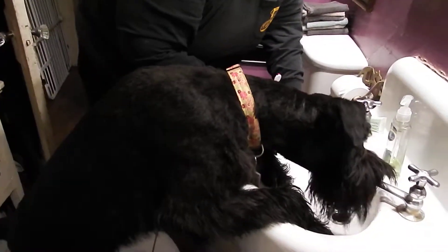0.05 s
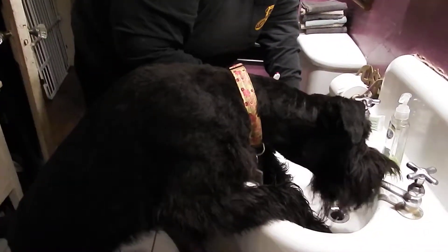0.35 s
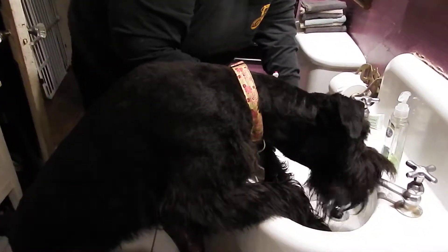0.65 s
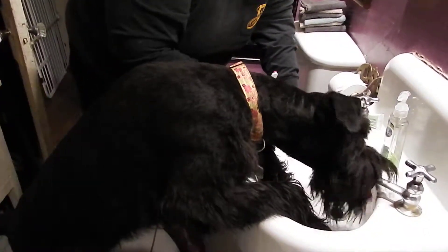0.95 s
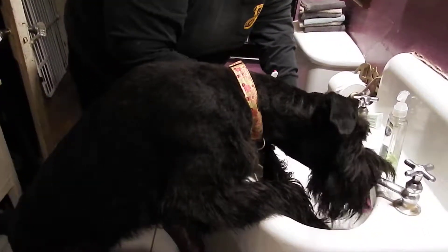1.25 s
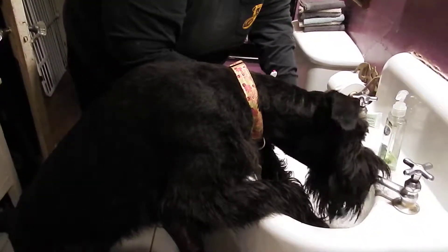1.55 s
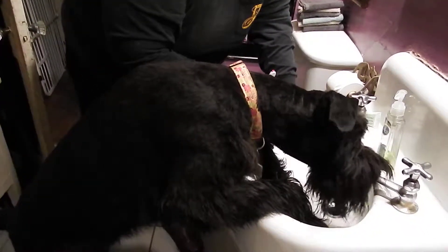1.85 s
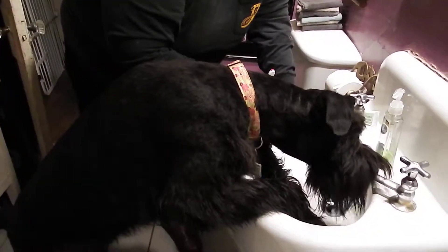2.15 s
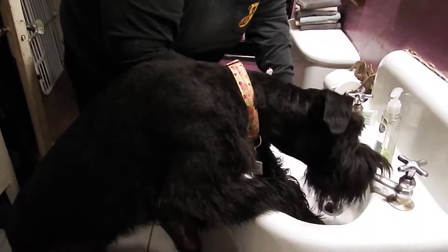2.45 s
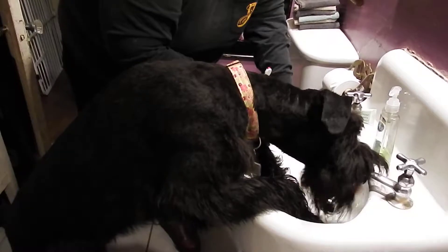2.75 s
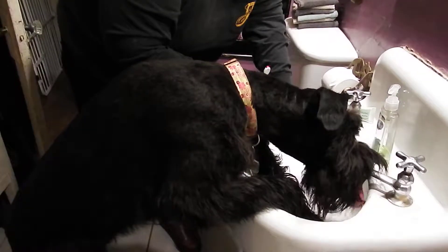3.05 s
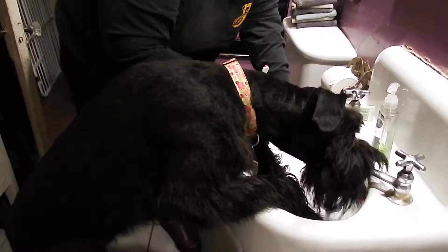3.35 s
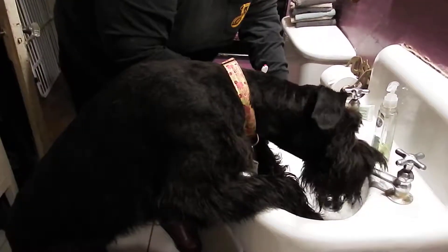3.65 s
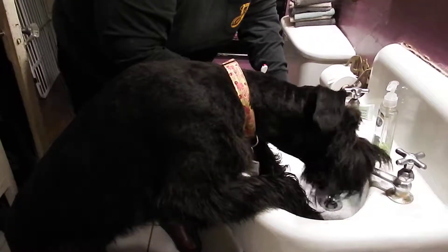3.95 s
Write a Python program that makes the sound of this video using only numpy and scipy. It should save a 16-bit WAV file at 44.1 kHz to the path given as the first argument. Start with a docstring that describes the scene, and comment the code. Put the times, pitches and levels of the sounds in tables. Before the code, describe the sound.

A dog laps water in a sink for the whole four seconds, about three licks a second, heard close in a small bathroom. Each slurp is often followed by a soft hollow gulp and a wet slap, with popping bubbles and droplets ticking on the basin. Sharper mouth clicks stand out around 2.2, 2.8 and 3.9 seconds. A thinly running tap hisses and trickles steadily underneath.

```python
"""A dog drinks from a tap

A dog laps at a thinly running tap in the basin of a small bathroom, about three times a second.
The tongue slurps through the water, often a hollow gulp follows, and the mouth shuts with a wet slap.
Bubbles pop and gurgle, droplets tick on the china, and the tap hisses throughout.
The hiss is filtered noise; the other wet sounds are short fading tones, alone or in swarms."""
import sys
import numpy as np
from scipy import signal
from scipy.fft import rfft, irfft, next_fast_len
from scipy.io import wavfile
from scipy.ndimage import uniform_filter1d

SR = 44100
rng = np.random.default_rng(int(sys.argv[2]) if len(sys.argv) > 2 else 0)


def dump_mix(stems):
    """Bounce the given channels to the path in sys.argv[1] as a 16-bit WAV at rate SR."""
    frames = np.atleast_2d(stems).T  # one column per channel
    limited = np.clip(frames, -1, 1)  # hard clip at full scale
    pcm = np.round(limited * 32767).astype(np.int16)
    wavfile.write(sys.argv[1], SR, pcm)


N = 176400  # 4 seconds

# the tone colour of the tap's hiss: f/Hz, level/dB
HISS_COLOUR = [(50, -39), (130, -5.5), (300, -1.5), (480, -8.5), (660, -1), (1400, -2), (5100, -2.5),
               (6200, -17), (15500, -19)]
# the spout rings in the hiss, the highest pitch as a thin whistle: f/Hz, boost/dB
SPOUT_RESONANCES = [(2490, 1), (2870, 5.5), (4450, 3.5), (4900, 5), (11220, 8.5)]
# droplets tick on the china: t/s, level/dB
TICKS = [(.484, -12), (.805, -18.5), (1.181, -17.5), (1.506, -26), (1.733, -19), (2.235, -18), (2.583, -29),
         (2.858, -26), (2.973, -21.5), (3.668, -30), (3.697, -11), (3.942, -28)]
# large bubbles gurgle: t/s, level/dB, f/Hz
GURGLES = [(.076, -39.5, 760), (.394, -44, 716), (.772, -45, 630), (1.096, -44.5, 660), (1.389, -41, 1020),
           (1.486, -41.5, 716), (1.802, -47, 610), (1.876, -41.5, 673), (1.916, -41.5, 1430),
           (2.5, -40.5, 1350), (3.218, -41.5, 885), (3.32, -40, 836), (3.672, -40.5, 1390)]
# small bubbles pop: t/s, level/dB, f/Hz
POPS = [(.103, -23.5, 1670), (0.116, -19, 3715), (0.282, -20.5, 3170), (0.3959, -18.5, 1770),
        (0.481, -19.5, 1620), (.495, -19.5, 3870), (0.654, -26, 2100), (0.786, -21, 1860),
        (0.801, -16.5, 1510), (1.1, -22.5, 1900), (1.375, -24.5, 3580), (1.494, -18.5, 1860),
        (1.894, -18.5, 3660), (2.111, -19.5, 2190), (2.488, -14, 1940), (2.495, -19.5, 1690),
        (2.584, -26, 3830), (2.834, -24.5, 3360), (2.857, -16, 2024), (2.972, -20, 1590),
        (3.548, -23.5, 2000), (3.696, -19.5, 3870), (3.707, -25, 3570), (3.947, -16, 2030),
        (3.967, -16.5, 2120), (3.987, -17.5, 1800)]
# drips plop into the water: t/s, level/dB, f/Hz
DRIPS = [(0.93, -43.5, 596), (1.611, -32, 1220), (1.636, -37.5, 718), (2.531, -33, 598),
         (3.629, -36.5, 620), (3.751, -33, 1230)]
# sharp wet clicks of the mouth: t/s, level/dB, f/Hz
MOUTH_CLICKS = [(1.177, -16.5, 2070), (2.215, -13, 2540), (2.436, -17.5, 2320), (2.7679, -8.5, 2550),
                (3.069, -13.5, 2430), (3.877, -9, 2210), (3.937, -13, 3400)]
# the mouth slaps shut: t/s, slosh level/dB, spray level/dB
SLAPS = [(0.097, -41.5, -39.5), (.481, -36, -44), (.8, -35, -36.5), (1.175, -35, -35.5),
         (1.508, -36, -37.5), (1.893, -40.5, -39), (2.22, -34, -33), (2.579, -38, -37), (2.969, -39, -33.5),
         (3.336, -45.5, -41), (3.662, -50.5, -40.5)]
# hollow gulps under the tongue: t/s, level/dB
GULPS = [(0.069, -48.5), (.452, -40), (0.763, -49.5), (1.149, -38.5), (1.474, -44.5), (2.191, -41),
         (2.532, -38.5), (2.934, -43.5), (3.652, -42)]
# the tongue draws through the water: t/s, length/s, level/dB, f/Hz
SLURPS = [(0.0, 0.026, -42.5, 2850), (0.272, 0.027, -37, 3080), (0.346, 0.1, -40.5, 2900),
          (0.66, 0.099, -40, 2420), (1.036, 0.058, -36.5, 2640), (1.361, 0.099, -38, 2680),
          (1.757, 0.059, -36, 3280), (1.828, 0.055, -41.5, 3120), (2.092, 0.077, -35, 2815),
          (2.43, 0.077, -36, 2435), (2.55, 0.017, -37.5, 2460), (2.83, 0.095, -41, 2690),
          (3.183, 0.069, -36, 2340), (3.54, 0.054, -40.5, 2640), (3.93, 0.083, -41.5, 2400)]
# echoes off the basin: delay/s, gain
BASIN_ECHOES = [(.0021, 1), (.0079, 0.31)]
# how wide the reflected sound is, as the part that differs between left and right: f/Hz, level/dB
STEREO_WIDTH = [(100, -8.5), (2400, -20), (8000, 0)]
# the basin and room favour these pitches: f/Hz, boost/dB
ROOM_RESONANCES = [(620, 3.5), (868, 1.5), (1004, 4), (1654, 5)]
# the microphone's tone colour: f/Hz, level/dB
MIC_COLOUR = [(235, -20.5), (290, -6), (5100, -1), (5900, -7), (9000, -8.5), (15000, -21.5)]

BUBBLE_RISE_OCT_PER_S, BUBBLE_ONSET_CYCLES = 15.2, 0.31  # OCT means octaves
SPATTER_HZ, SPATTER_SPREAD_OCT = 8000, 0.44


def from_db(db):
    """Turn decibels into a factor to multiply by."""
    return 10 ** (np.asarray(db) / 20)


def rms_one(x):
    """Scale a sound so that its average strength (rms) is one."""
    return x / np.sqrt(np.mean(x ** 2) + 1e-20)


def seconds(length):
    """The time of each sample, in seconds."""
    return np.arange(int(length * SR)) / SR


def add(out, start_s, sound):
    """Mix a sound in at a given time."""
    i = int(np.clip(start_s * SR, 0, len(out)))
    out[i:i + len(sound)] += sound[:len(out) - i]


def coloured(x, points):
    """Make pitches louder or softer along a table of f/Hz, level/dB."""
    n = 2 * next_fast_len(len(x))
    hz, db = np.transpose(points)
    bin_hz = np.arange(n // 2 + 1) * SR / n
    curve_db = np.interp(np.log(bin_hz + 1), np.log(hz), db)
    cepstrum = irfft(np.log(from_db(curve_db)))
    # fold it so that the filter rings only after a sound, never before (minimum phase)
    cepstrum[1:n // 2] *= 2
    cepstrum[n // 2 + 1:] = 0
    return irfft(rfft(x, n) * np.exp(rfft(cepstrum)))[:len(x)]


def boosted(x, resonances, width_hz):
    """Make narrow bands ring, from a table of f/Hz, boost/dB."""
    for hz, db in resonances:
        band = signal.lfilter(*signal.iirpeak(hz, hz / width_hz, fs=SR), x)
        x = x + (from_db(db) - 1) * band
    return x


def high_pass(x, hz):
    """Turn down what lies below a pitch."""
    return signal.sosfilt(signal.butter(3, hz, "high", fs=SR, output="sos"), x)


def evened(response):
    """Even out the broad tone colour of a room's echo and keep its fine ripple."""
    hz = np.arange(1, len(response) // 2 + 1) * SR / len(response)
    power = np.abs(rfft(response)[1:]) ** 2
    levelling_db = 10 * np.log10(power.mean() / uniform_filter1d(power, size=48))
    return coloured(response, np.column_stack([hz, levelling_db]))


def bubble(hz, cycles):
    """A bubble rings: a tone that starts fast, rises a little and fades by 60 dB within its cycles."""
    t = seconds(cycles / hz)
    phase = np.cumsum(hz * 2 ** (BUBBLE_RISE_OCT_PER_S * t)) / SR
    onset = 1 - np.exp(-t * hz / BUBBLE_ONSET_CYCLES)
    fade = from_db(-60 * t * hz / cycles)
    return np.sin(2 * np.pi * phase) * onset * fade


def froth(envelope, hz, spread_oct, per_s, cycles=13, fall_oct=0):
    """A swarm of bubbles around a pitch that can slide, as strong as the envelope (a loudness curve)."""
    out = np.zeros(len(envelope) + SR // 20)
    length = len(envelope) / SR
    count = int(per_s * length) + 1
    swarm_rng = np.random.default_rng(rng.integers(1 << 30))
    for k, (jitter, pitch, size, sign) in enumerate(swarm_rng.standard_normal((count, 4))):
        progress = (k + jitter) / count % 1
        octaves = spread_oct * np.fmod(pitch, 2) - fall_oct * (progress - .5)
        bubble_hz = np.clip(hz * 2 ** octaves, 200, 12000)
        strength = envelope[int(progress * (len(envelope) - 1))]
        scatter_db = 5 * min(size, 2)
        gain = strength * from_db(scatter_db) * np.sqrt(bubble_hz / hz)
        add(out, progress * length, np.sign(sign) * gain * bubble(bubble_hz, cycles))
    return out * np.sqrt(np.sum(envelope ** 2) / (np.sum(out ** 2) + 1e-20))


def bathroom(x, pan_db=0, reverb_db=0):
    """The sound reaches two close microphones directly, off the basin and off the walls."""
    t = seconds(.4)

    def reverb(db, fade_s):
        """Echoes blur into noise that builds up quickly and dies by 60 dB in fade_s."""
        fade = from_db(-60 * t / fade_s) * (1 - np.exp(-t / 0.006))
        return from_db(db + reverb_db) * fade / np.sqrt(np.sum(fade ** 2)) * rng.standard_normal(len(t))

    # early echoes plus a short tail; left is mid + side, right is mid - side
    mid, side = (reverb(db=4, fade_s=0.053) + reverb(db=-2.5, fade_s=0.23) for _ in range(2))
    mid[0] += 1  # the direct sound
    for delay_s, gain in BASIN_ECHOES:
        add(mid, delay_s, np.array([gain]))
    mid, side = evened(mid), coloured(side, STEREO_WIDTH)
    left = from_db(pan_db) * signal.fftconvolve(x, mid + side)[:N]
    right = from_db(-pan_db) * signal.fftconvolve(x, mid - side)[:N]
    return np.array([left, right])


def tap():
    """A hiss that rings in the spout, a fine trickle into the basin and its stray droplets."""
    noise = coloured(rng.standard_normal(N), HISS_COLOUR)
    hiss = from_db(-49) * rms_one(boosted(noise, SPOUT_RESONANCES, width_hz=110))
    steady = np.ones(N)
    trickle = from_db(-55) * froth(steady, hz=2364, spread_oct=.6, per_s=260, cycles=57)
    strays = from_db(-65.5) * froth(steady, SPATTER_HZ, SPATTER_SPREAD_OCT, per_s=45)
    return hiss + (trickle + strays)[:N]


def droplets():
    """Droplets hit the china with very short, bright ticks."""
    out = np.zeros(N)
    for start_s, db in TICKS:
        add(out, start_s, from_db(db) * bubble(hz=9220, cycles=11.3))
    return high_pass(out, hz=6200)


def glug(hz, rise_oct_per_s, swell_s, length_s=.05):
    """A cluster of large bubbles swells, rises in pitch and fades."""
    t = seconds(length_s)
    envelope = (t / swell_s * np.exp(1 - t / swell_s)) ** 2
    return froth(envelope, hz, spread_oct=0.09, per_s=600, fall_oct=-rise_oct_per_s * length_s)


def stirred_water():
    """Large bubbles gurgle, small ones pop and drips plop into the water."""
    out = np.zeros(N)
    for start_s, db, hz in GURGLES:
        add(out, start_s, from_db(db) * glug(hz, rise_oct_per_s=1, swell_s=0.01))
    for start_s, db, hz in POPS:
        add(out, start_s, from_db(db) * bubble(hz, cycles=0.01 * hz))  # each lasts 0.01 s
    for start_s, db, hz in DRIPS:
        add(out, start_s, from_db(db) * bubble(hz, cycles=28))
    return out


def spatter(envelope):
    """Tiny bright droplets fly off, much softer than the slurp or slap that throws them."""
    return from_db(-22.5) * froth(envelope, SPATTER_HZ, SPATTER_SPREAD_OCT, per_s=700)


def mouth():
    """The mouth gulps, clicks and slaps shut with a low slosh and a bright spray."""
    out = np.zeros(N)
    attack_s, fade_s = 0.0065, 0.12
    t = seconds(fade_s)
    envelope = np.minimum(t / attack_s, from_db(-60 * (t - attack_s) / fade_s))
    for start_s, slosh_db, spray_db in SLAPS:
        slosh = froth(envelope, hz=780, spread_oct=0.677, per_s=1800)
        spray = froth(envelope, hz=2163, spread_oct=0.677, per_s=1800)
        add(out, start_s, from_db(slosh_db) * slosh)
        add(out, start_s, from_db(spray_db) * (spray + spatter(envelope)))
    for start_s, db in GULPS:
        add(out, start_s, from_db(db) * glug(hz=308, rise_oct_per_s=2.9, swell_s=0.0064))
    for start_s, db, hz in MOUTH_CLICKS:
        add(out, start_s, from_db(db) * bubble(hz, cycles=7.1))
    return out


def tongue():
    """Each slurp is a crackle of bubbles that throws spatter and sinks in pitch as the tongue draws back."""
    out = np.zeros(N)
    for start_s, length_s, db, hz in SLURPS:
        progress = seconds(length_s) / length_s
        envelope = np.interp(progress, [0, 0.37, 1], [.25, 1, .2])
        slurp = froth(envelope, hz, spread_oct=0.44, per_s=700, cycles=28, fall_oct=0.27)
        add(out, start_s, from_db(db) * (slurp + spatter(envelope)))
    # once, a growing air pocket under the tongue gurgles downwards
    steady = np.ones_like(seconds(.09))
    pocket = froth(steady, hz=820, spread_oct=.04, per_s=600, cycles=28, fall_oct=.65)
    add(out, start_s=2.426, sound=from_db(-51.5) * pocket)
    return out


def scene():
    """The dog, the droplets and the tap sound together in the ringing room."""
    lapping = high_pass(tongue() + mouth() + stirred_water(), hz=145)
    dog = bathroom(lapping)
    ticks = bathroom(droplets(), pan_db=-3, reverb_db=-7)  # to the right, with less echo
    running_water = bathroom(tap())
    return boosted(dog + ticks + running_water, ROOM_RESONANCES, width_hz=35)


def record(dry):
    """A small microphone: thin bass, dull treble, one narrow dip and no very high pitches."""
    toned = [coloured(channel, MIC_COLOUR) for channel in dry]
    notched = signal.lfilter(*signal.iirnotch(1087.6, Q=4.95, fs=SR), toned)
    low_pass = signal.cheby2(16, 60, 16200, fs=SR, output="sos")  # 60 dB down from 16200 Hz up
    return signal.sosfilt(low_pass, notched)


dry = scene()
out = record(dry)
dump_mix(out)
```